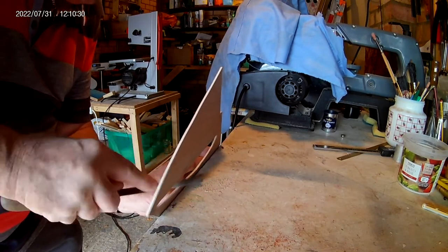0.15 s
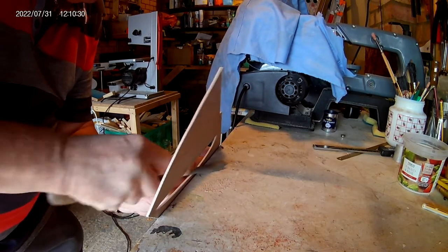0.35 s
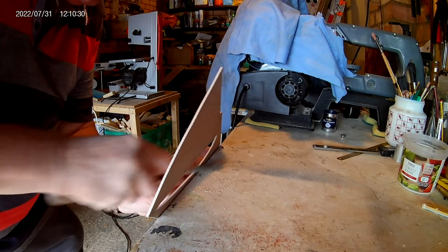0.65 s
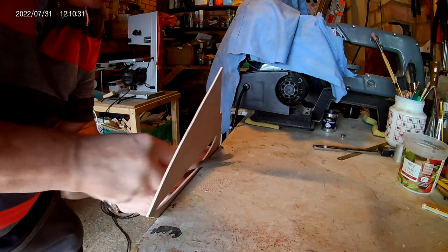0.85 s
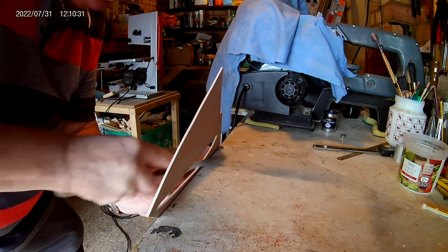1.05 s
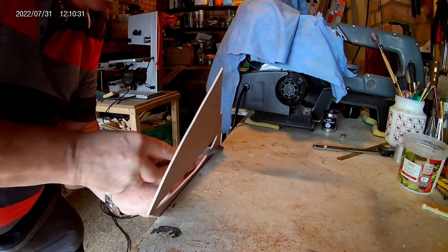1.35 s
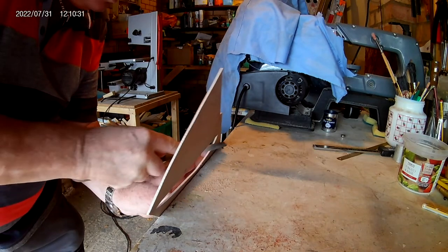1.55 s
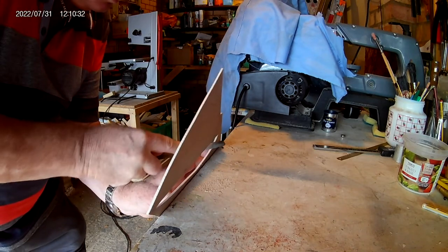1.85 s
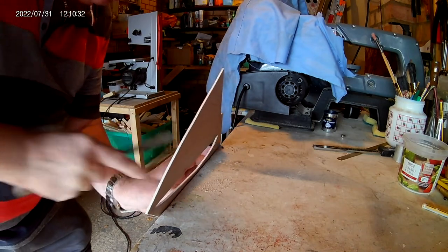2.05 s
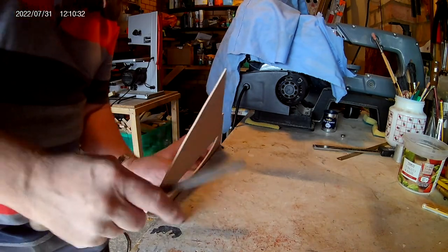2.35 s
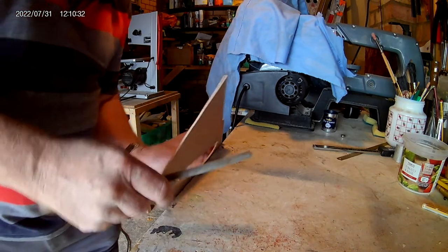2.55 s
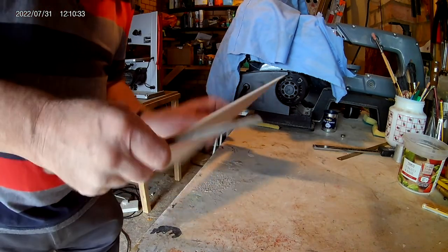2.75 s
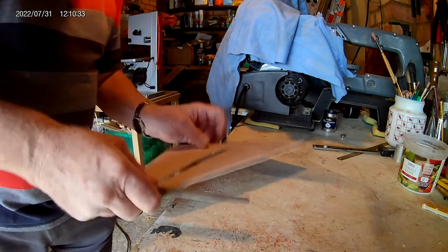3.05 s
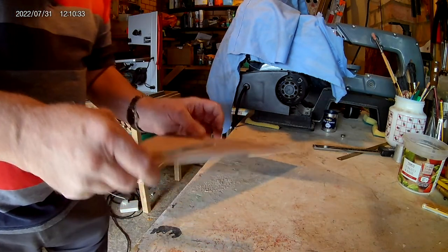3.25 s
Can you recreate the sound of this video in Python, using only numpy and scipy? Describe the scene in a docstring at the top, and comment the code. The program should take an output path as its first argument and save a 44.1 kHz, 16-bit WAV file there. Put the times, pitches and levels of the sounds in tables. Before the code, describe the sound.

A hand file rasps on a thin wooden board, which is then set down clattering.

```python
"""Filing a thin wooden board

A hand file rasps to and fro in a slot of a thin board held on edge on a bench; the strokes grow lighter.
Snapping fibres excite the resonances of wood and steel; when the teeth bite evenly, the board buzzes.
The file is drawn out and the board is laid down with a clatter and a tap, each impact ringing freely.
A small workshop adds short reverberation and a low rumble."""
import sys
import numpy as np
from scipy import signal
from scipy.fft import rfft, irfft
from scipy.io import wavfile

SR = 44100
rng = np.random.default_rng(int(sys.argv[2]) if len(sys.argv) > 2 else 0)


def materialize(psi):
    """Save the field psi as 16-bit PCM at rate SR to the path in sys.argv[1].

    A 1-D psi becomes a single channel; in a 2-D psi each row is a channel.
    """
    bounded = np.clip(np.atleast_2d(psi).T, -1, 1)
    quanta = np.round(bounded * 32767).astype(np.int16)
    wavfile.write(sys.argv[1], SR, quanta)


N = 149940

# Rumble and hiss of the workshop: frequency_hz, level_db
RUMBLE_SPECTRUM = [(20, -5.5), (45, -3), (100, -5.5), (170, -10), (255, -14), (400, -19), (520, -23.5),
                   (920, -31), (1500, -35.5), (2200, -42), (3300, -49), (5500, -55), (7000, -61),
                   (15500, -69)]
# Reverberation time of the room: frequency_hz, t60_s
ROOM_DECAY = [(150, 0.42), (800, 0.18), (2100, 0.16), (5500, 0.22), (14000, 0.28)]
# Reflections off the bench top and tools: delay_s, gain_db
NEAR_REFLECTIONS = [(.0013, -16), (.0029, -13.5), (.0047, -12), (.0071, -19.5)]
# Impacts of board, file and bench: start_s, level_db, tilt_db_per_octave, ring_db, thump_db, pitch_ratio
IMPACTS = [(1.633, -47.5, -8, -4.5, -5, 0.75), (1.668, -51, -2, 0.5, -9, 0.9),
           (2.328, -47.5, -5, 3, -4, .9), (2.333, -44, -16.5, -16.5, -14, 1.11),
           (2.497, -52, -1, -4, -13, 0.87), (2.551, -49.5, -5, -6.5, -10, .95),
           (2.633, -56.5, -0.5, -15, -14, .95), (2.8417, -33.5, 1, -1, -3, 0.92),
           (2.8468, -32, -5, -2, -7.5, 0.95), (2.8599, -47, 5, -3, -12, 1.03),
           (2.8727, -40.5, 0.5, 0, 7.5, 0.97), (3.0124, -39.5, -1, -6, -21, 0.93),
           (3.0172, -41, -3.5, 0, 11.5, 1), (3.2455, -67, 3.5, 5.5, -17, 1.15)]
# Modes rung by an impact: pitch_hz, level_db, t60_s
IMPACT_MODES = [(300, -13, .14), (540, -9, .08), (622, -2, .13), (750, 0, .11), (1120, -2, .18),
                (1314, -10, .16), (1480, -8, .13), (1810, -8, .09), (2340, -7, .08), (2850, -19, .09),
                (3510, -18, .09), (4080, -17, .08), (5340, -24, .08)]
# Contact noise of an impact: frequency_hz, level_db
CRACK_SPECTRUM = [(100, -10.5), (500, 0.5), (900, 0.5), (2300, -2), (3200, -17), (4300, -17), (5800, -23.5),
                  (6300, -37.5), (10500, -42.5), (15500, -55)]
# Spectral envelopes of the rasp, the board's boom, the tearing edge and the steel: frequency_hz, level_db
RASP_SPECTRUM = [(200, -19), (500, -2), (720, 10), (920, 1.5), (1150, 3), (1450, -2), (1950, -10),
                 (2280, -9), (2550, -31.5), (4500, -31.5), (9000, -59.5)]
BOOM_SPECTRUM = [(100, -52.5), (260, -10.5), (360, -3), (520, -0.5), (740, 9.5), (900, -18.5), (1500, -68),
                 (4000, -60)]
TEAR_SPECTRUM = [(1200, -37.5), (1800, 3), (2200, 4.5), (2450, -6.5), (2700, 1.5), (3150, 1), (3400, -7),
                 (4100, -10), (4600, -23.5), (9000, -42)]
STEEL_SPECTRUM = [(1200, -42.5), (2400, -4), (3150, -3), (3400, -2.5), (4500, -7), (5100, -4.5), (5700, -6),
                  (6300, -21), (7200, -23), (7900, -31.5), (10400, -26), (11300, -31.5), (15500, -52.5)]
# Resonances of the board: centre_hz, width_hz, gain_db
BOARD_RESONANCES = [(370, 40, 5), (430.5, 29, 3), (505.7, 21, 12.5), (658, 26, 7), (770, 25, -1),
                    (947, 17, 0.5), (1073, 17, 11.5), (1190, 40, 5), (1319, 45, 4.5), (1425, 22, 9),
                    (1653, 22, 11), (1815, 27, 7.5), (2200, 17, -1), (2214, 55, 13.5)]
# File resonances, with treble notches from microphone and comb colouring: centre_hz, width_hz, gain_db
TREBLE_BANDS = [(2855, 40, 7), (3100, 90, 7), (3350, 90, -4), (3950, 140, 6), (4540, 110, -9),
                (4900, 80, 5), (5420, 150, 7), (5880, 45, 10), (6300, 130, -6), (6780, 110, 10),
                (7850, 300, -12), (8860, 160, 10), (9220, 200, -16), (9680, 120, 9), (10000, 80, 11),
                (10260, 100, -14), (10530, 80, 13), (11850, 80, 11)]
# Runs of evenly biting teeth: start_s, length_s, first_rate_hz, last_rate_hz, level_db
EVEN_BITES = [(0.042, 0.021, 646, 660, -31.5), (.118, 0.097, 717, 614, -33.5),
              (.212, 0.04, 556.5, 501, -31.5), (0.233, 0.034, 728, 679, -35),
              (0.238, 0.037, 398, 368, -36.5), (.296, 0.031, 594, 603, -43), (0.299, .055, 380, 424, -38.5),
              (0.327, 0.0768, 614.6, 666, -30.5), (0.431, 0.024, 737, 690, -39.5),
              (0.525, 0.058, 651, 618, -28.5), (.563, 0.064, 447, 571.5, -29),
              (0.579, .055, 715, 679, -36.5), (0.792, 0.04, 342, 393.5, -32), (0.816, 0.027, 415, 493, -29),
              (0.856, 0.047, 427.7, 428.5, -29), (.946, 0.031, 623, 672, -34.5),
              (0.976, .045, 702, 740, -40), (1.142, 0.029, 783, 733, -37.5), (1.187, 0.033, 749, 696, -35),
              (1.348, 0.033, 690, 676, -43), (1.524, 0.053, 734, 698, -42.5),
              (1.598, 0.037, 683, 652, -50.5)]
# Light slides of file and board: start_s, length_s, crest_fraction, wood_db, steel_db
LIGHT_SLIDES = [(1.905, 0.29, .6, -71.5, -77.5), (2.165, 0.33, 0.24, -68.5, -81),
                (2.362, 0.055, 0.2, -55, -65), (2.421, 0.045, 0.7, -55.5, -70.5),
                (2.461, 0.043, 0.7, -53.5, -73), (2.507, .11, 0, -65.5, -69.5),
                (2.573, 0.075, 0.4, -62.5, -79), (2.633, 0.29, 0.98, -56, -71),
                (2.774, 0.031, 0.4, -57.5, -90), (3.138, 0.05, .4, -82, -81)]
# Strokes of the file: start_s, length_s, crest_fraction, rasp_db, boom_db, tear_db, steel_db
FILE_STROKES = [(-.06, 0.18, 0.1, -36.5, -37.5, -51, -56.5), (0.1, 0.17, 0.45, -40, -43.5, -47.5, -55.5),
                (0.21, 0.061, 0.7, -48.5, -37.5, -61, -70), (0.279, 0.21, 0.39, -39, -38.5, -55.5, -60),
                (0.469, 0.19, 0.32, -41, -42, -50, -58.5), (0.548, 0.16, 0.39, -40, -37.5, -52.5, -60),
                (0.774, .16, 0.53, -39.5, -35, -54.5, -61), (0.927, 0.085, 0.58, -46.5, -44.5, -59, -66.5),
                (0.987, 0.13, 0.28, -40.5, -44, -56, -60), (1.141, 0.13, 0.08, -45.5, -39.5, -62.5, -60.5),
                (1.27, .17, 0.52, -53, -49, -66, -70), (1.477, 0.1, 0.76, -48, -43.5, -66, -67),
                (1.586, 0.16, 0.08, -58.5, -51.5, -76, -77), (1.782, 0.12, 0.5, -58, -52, -78, -75)]


def amp(db):
    """Amplitude ratio of a level in decibels."""
    return 10 ** (np.asarray(db) / 20)


def unit(x):
    """Normalisation to an rms of 1."""
    return x / np.sqrt(np.mean(x ** 2) + 1e-20)


def curve_at(points, hz):
    """Interpolation on a logarithmic frequency axis."""
    f, value = np.transpose(points)
    return np.interp(np.log(hz + 1), np.log(f + 1), value)


def add(mix, start_s, sound):
    """Superposition: a sound joins the mix at its start time."""
    at = round(start_s * SR)
    sound = sound[max(-at, 0):]
    part = mix[max(at, 0):][:len(sound)]
    part += sound[:len(part)]


def colour(x, spectrum, bands=(), tilt_db=0, size=8192):
    """Minimum-phase filtering by a spectral envelope, a tilt per octave, Lorentzian peaks and notches."""
    hz = np.fft.rfftfreq(size, 1 / SR)
    db = curve_at(spectrum, hz) + tilt_db * np.log2(np.clip(hz, 300, 6000) / 1000)
    for centre_hz, width_hz, gain_db in bands:
        db = db + gain_db / (1 + (2 * (hz - centre_hz) / width_hz) ** 2)
    log_gain = np.log(amp(np.r_[db, db[-2:0:-1]]))
    response = np.exp(np.conj(signal.hilbert(log_gain)))
    taps = np.fft.ifft(response).real[:size // 2]
    return signal.fftconvolve(x, taps)[:len(x)]


def wander(rate_hz):
    """Random modulation: low-pass noise with an rms of 1."""
    hz = np.fft.rfftfreq(N, 1 / SR)
    return unit(irfft(rfft(rng.standard_normal(N)) * np.exp(-(hz / rate_hz) ** 2), N))


def swell(length_s, crest, steepness=1):
    """Amplitude envelope: a skewed half sine, from rest to a crest and back."""
    progress = np.linspace(0, 1, max(int(length_s * SR), 2))
    skewed = np.interp(progress, [0, np.clip(crest, .02, .98), 1], [0, .5, 1])
    return np.abs(np.sin(np.pi * skewed)) ** steepness


def workshop_rumble(level_db=-50.5):
    """Stationary noise: a low rumble with a faint hiss."""
    gain = amp(curve_at(RUMBLE_SPECTRUM, np.fft.rfftfreq(N, 1 / SR)))
    return amp(level_db) * unit(irfft(rfft(rng.standard_normal(N)) * gain, N))


def room(x, echoes_per_s=3000):
    """Reverberation: sparse reflections decay exponentially, the bass lasting longest."""
    t = np.arange(SR // 2) / SR
    echoes = rng.choice([-1., 1.], len(t)) * (rng.random(len(t)) < echoes_per_s / SR) * (t > .003)
    hz, times, spectra = signal.stft(echoes, SR, nperseg=256)
    decay = amp(-60 * times / curve_at(ROOM_DECAY, hz)[:, None])
    tail = signal.istft(spectra * decay, SR)[1]
    return signal.fftconvolve(x, tail / np.linalg.norm(tail))[:N]


def bench_reflections(x):
    """Comb filtering: echoes from near surfaces interfere with the direct sound."""
    out = x.copy()
    for delay_s, gain_db in NEAR_REFLECTIONS:
        add(out, delay_s, amp(gain_db) * x)
    return out


def knocks(crack_t60_s=.024, thump_hz=172, thump_t60_s=.07, rise_s=.0005):
    """Impact excitation: a short crack, damped free vibration of the wood and a thump of the bench."""
    out, t = np.zeros(N), np.arange(SR // 3) / SR
    fade = lambda t60_s: np.exp(-np.log(1000) * t / t60_s)
    rise = 1 - np.exp(-(t / rise_s) ** 2)
    thump = fade(thump_t60_s) * np.sin(2 * np.pi * thump_hz * t)
    for start_s, level_db, tilt_db, ring_db, thump_db, pitch_ratio in IMPACTS:
        crack = colour(rng.standard_normal(len(t)) * fade(crack_t60_s), CRACK_SPECTRUM, tilt_db=tilt_db)
        crack /= crack[:SR // 200].std()  # unit strength over the first 5 ms
        ring = np.zeros(len(t))
        for hz, mode_db, t60_s in IMPACT_MODES:
            gain = amp(mode_db + tilt_db * np.log2(hz / 1000))
            ring += gain * fade(t60_s) * np.sin(2 * np.pi * (hz * pitch_ratio * t + rng.random()))
        body = rise * (amp(ring_db) * ring + amp(thump_db) * thump) / 2
        add(out, start_s, amp(level_db) * (crack + body))
    return out


def tooth_buzz(jitter_fraction=.05, flutter_db=2.0, click_db=-15):
    """Forced vibration: evenly spaced teeth pluck the board, which hums at their rate, a click a tooth."""
    hum, pulses = np.zeros((2, N))
    jitter = 1 + jitter_fraction * wander(rate_hz=180)
    flutter = amp(flutter_db * wander(rate_hz=97))
    for start_s, length_s, first_hz, last_hz, level_db in EVEN_BITES:
        arch = swell(length_s, crest=.56)
        span = round(start_s * SR) + np.arange(len(arch))
        teeth_passed = np.cumsum(np.linspace(first_hz, last_hz, len(arch)) * jitter[span]) / SR
        force = amp(level_db) * arch * flutter[span]
        add(hum, start_s, force * np.sin(2 * np.pi * teeth_passed))
        add(pulses, start_s, force * unit(np.diff(np.floor(teeth_passed), prepend=0)))
    clicks = colour(pulses, RASP_SPECTRUM, BOARD_RESONANCES)
    filter_gain = colour(rng.standard_normal(N), RASP_SPECTRUM, BOARD_RESONANCES).std()
    return hum + amp(click_db) * clicks / filter_gain


def fibre_snaps(snaps_per_s=2600, spread_db=3.0, hiss_ratio=.55):
    """Shot noise: wood fibres snap at random times and strengths, over a steady hiss."""
    sizes = amp(spread_db * np.minimum(rng.exponential(1, N), 4))
    snaps = sizes * rng.choice([-1., 1.], N) * (rng.random(N) < snaps_per_s / SR)
    return unit(snaps) + hiss_ratio * rng.standard_normal(N)


def filing(wood_steepness=1.17, treble_steepness=1.66):
    """Source and filter: snaps swell with each stroke and ring the board, its torn edge and the file."""
    rasp, boom, tear, steel = np.zeros((4, N))  # amplitude envelopes
    for start_s, length_s, crest, rasp_db, boom_db, tear_db, steel_db in FILE_STROKES:
        arch = swell(length_s, crest, wood_steepness)
        treble_arch = swell(length_s, crest, treble_steepness)
        add(rasp, start_s, amp(rasp_db) * arch)
        add(boom, start_s, amp(boom_db) * arch)
        add(tear, start_s, amp(tear_db) * treble_arch)
        add(steel, start_s, amp(steel_db) * treble_arch)
    for start_s, length_s, crest, wood_db, steel_db in LIGHT_SLIDES:
        arch = swell(length_s, crest, wood_steepness)
        add(rasp, start_s, amp(wood_db) * arch)
        add(steel, start_s, amp(steel_db) * arch)
    snaps = fibre_snaps()

    def excite(envelope, spectrum, bands):
        return colour(snaps * envelope, spectrum, bands) / colour(snaps, spectrum, bands).std()

    board = excite(rasp, RASP_SPECTRUM, BOARD_RESONANCES) + excite(boom, BOOM_SPECTRUM, BOARD_RESONANCES)
    edge = excite(tear, TEAR_SPECTRUM, BOARD_RESONANCES + TREBLE_BANDS)
    blade = excite(steel, STEEL_SPECTRUM, TREBLE_BANDS)
    return board + edge + bench_reflections(blade)


def scene(filing_room_db=-9, knock_room_db=-5.5):
    """Superposition of direct sound, reverberation and background noise in one channel."""
    work, hits = filing() + tooth_buzz(), knocks()
    reverberation = amp(filing_room_db) * room(work) + amp(knock_room_db) * room(hits)
    return (work + hits + reverberation + workshop_rumble())[None]


def record(dry):
    """Band limiting by a linear-phase low-pass filter."""
    cutoff_hz = 15700
    taps = signal.firwin(511, cutoff_hz, window=("kaiser", 9), fs=SR)
    padded = np.pad(dry[0], len(taps) // 2, "reflect")
    return signal.oaconvolve(padded, taps, "valid")[None]


dry = scene()
out = record(dry)
materialize(out)
```